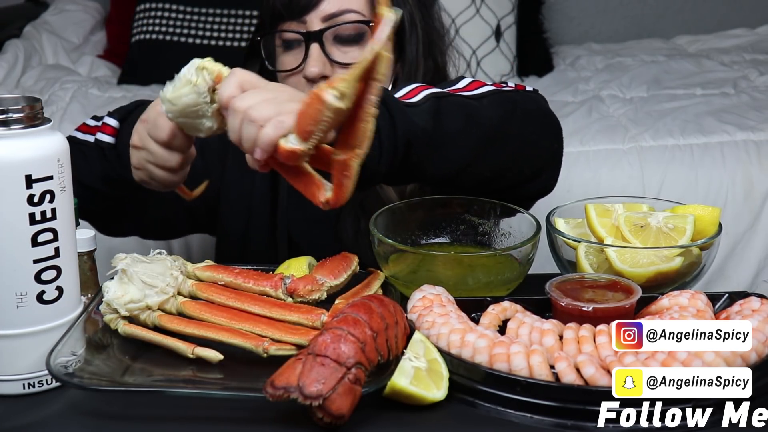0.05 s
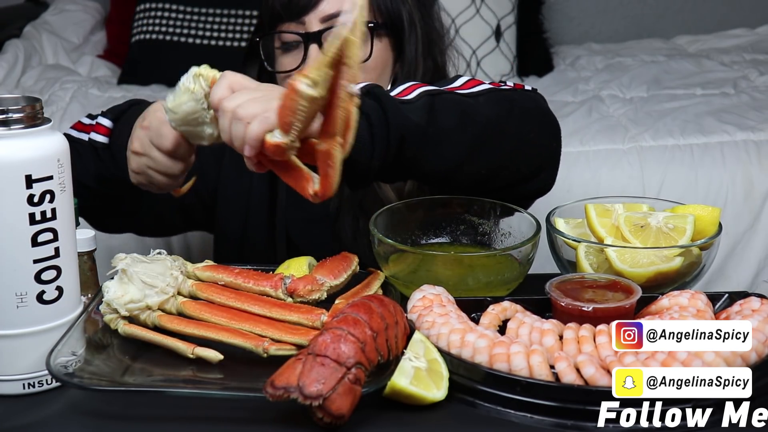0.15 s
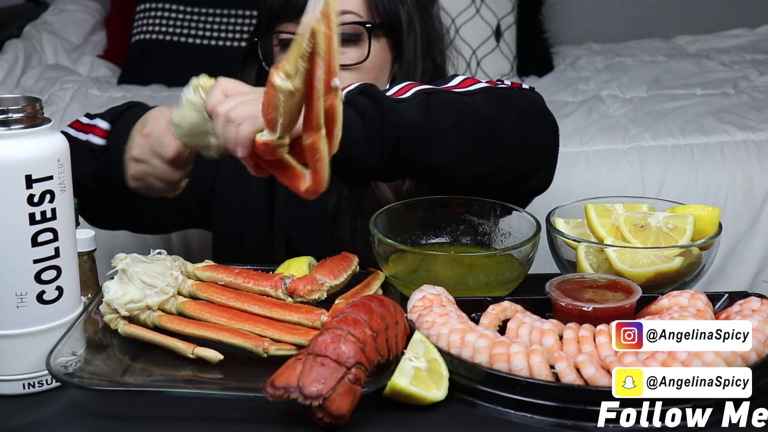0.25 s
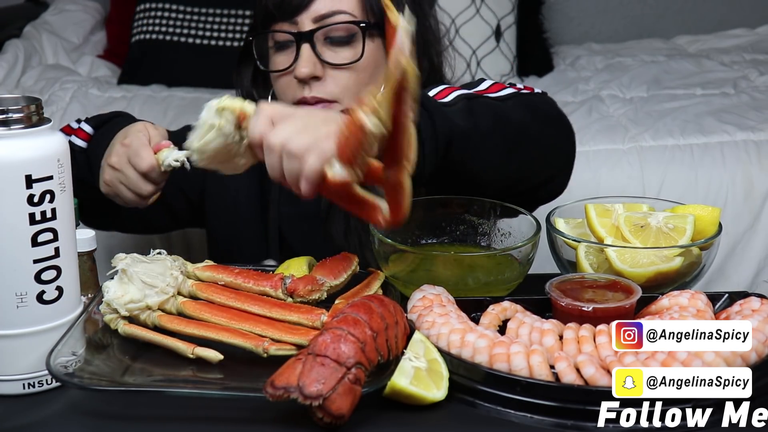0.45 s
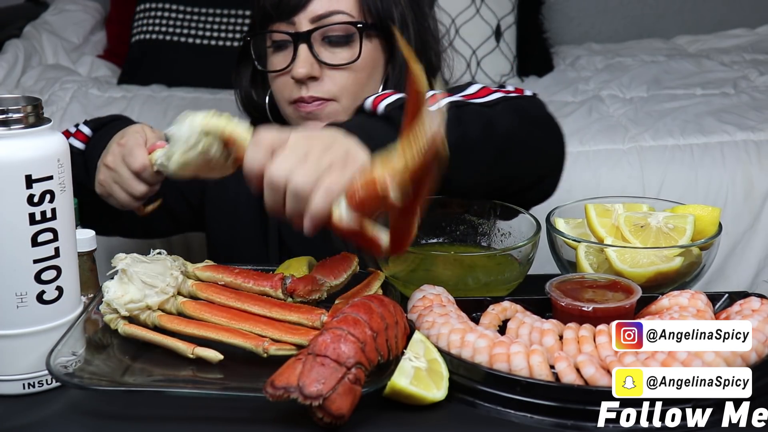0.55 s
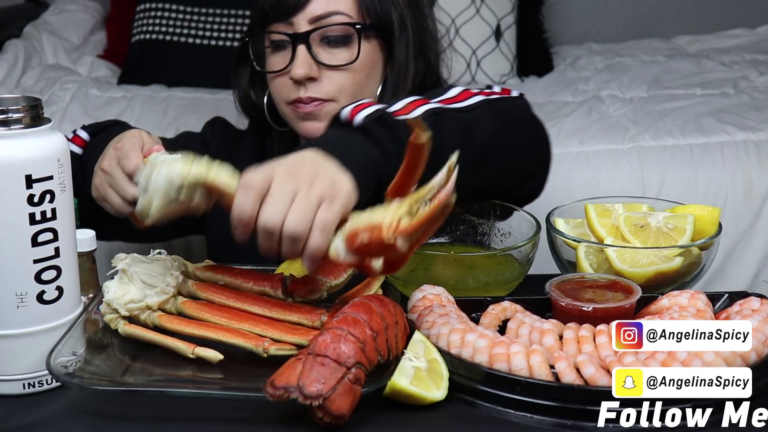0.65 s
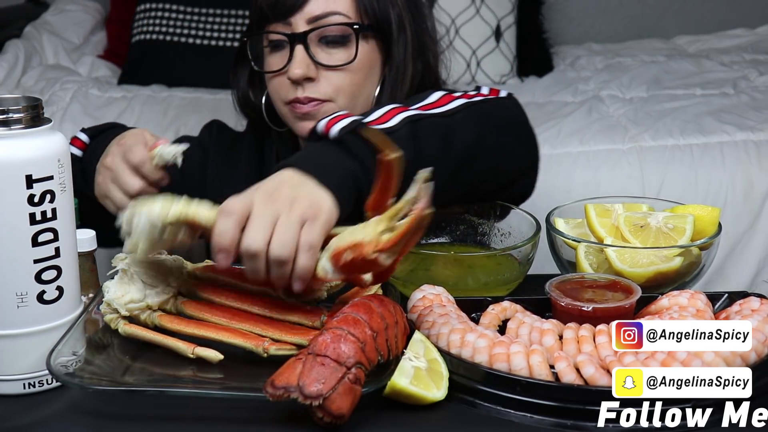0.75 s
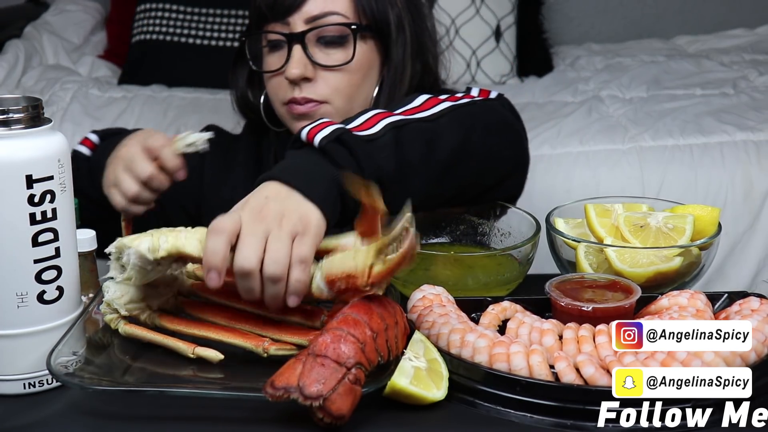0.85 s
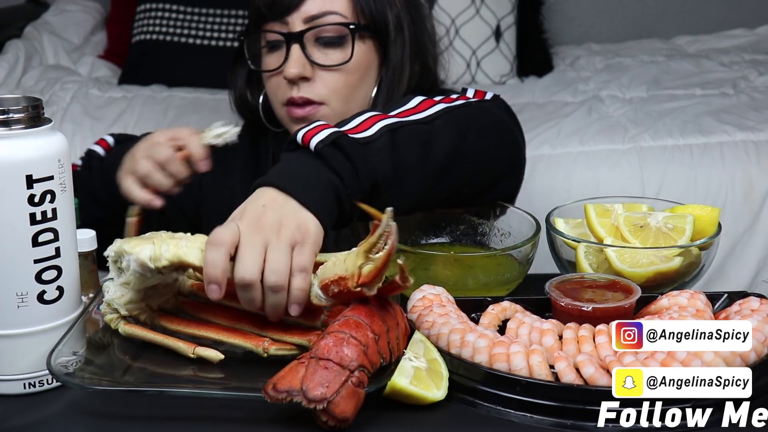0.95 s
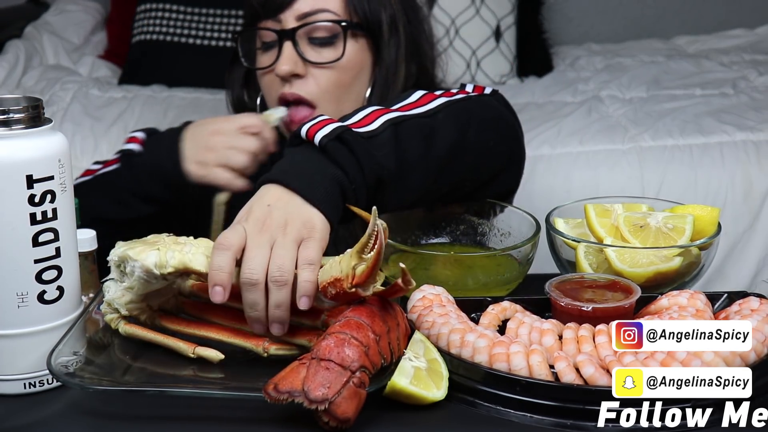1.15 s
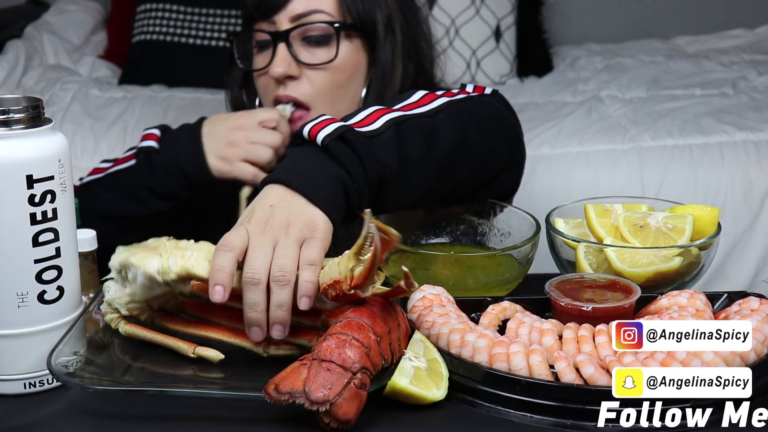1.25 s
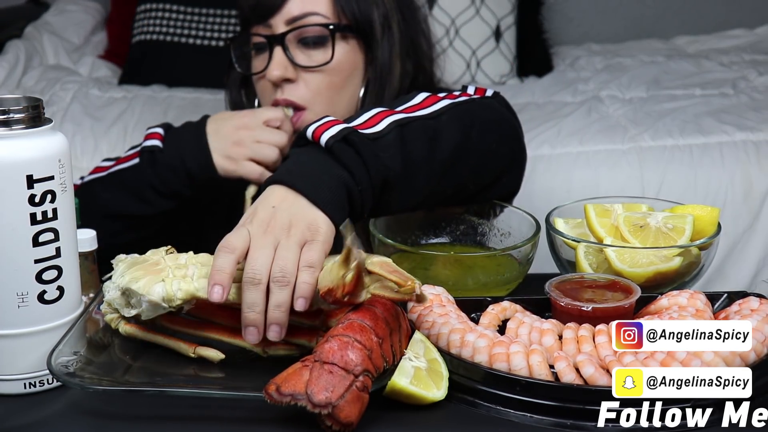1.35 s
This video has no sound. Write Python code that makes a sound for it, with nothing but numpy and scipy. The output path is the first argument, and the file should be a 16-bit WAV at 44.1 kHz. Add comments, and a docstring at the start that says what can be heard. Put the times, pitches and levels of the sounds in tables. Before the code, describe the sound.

Crab shell splinters and snaps in a quick run, followed by a knock and light ticks.

```python
"""Cracking a crab leg

A crab leg is bent by hand in a small room. It splinters and gives way in a growing run of cracks,
each a tiny blow that makes the shell ring. Soft thuds follow as the piece comes free. The cluster of
legs knocks down on a platter, the table wobbles, and the shells tick and rub as they are handled.
Glasses on the table ring faintly along."""
import sys
import numpy as np
from scipy import signal
from scipy.fft import rfft, irfft
from scipy.io import wavfile
from scipy.ndimage import uniform_filter1d

SR = 44100
rng = np.random.default_rng(int(sys.argv[2]) if len(sys.argv) > 2 else 0)


def transcribe(signal):
    """Save signal, clipped to [-1, 1], as a 16-bit WAV file at the path in sys.argv[1]."""
    frames = np.atleast_2d(signal).T
    limited = np.clip(frames, -1, 1)
    pcm = np.round(limited * 32767).astype(np.int16)
    wavfile.write(sys.argv[1], SR, pcm)


N = 61739
T = np.arange(N) / SR
SNAP_LOW_HZ, SNAP_HIGH_HZ = 8370, 14000


def from_db(db):
    """Turn decibels into a gain to multiply by."""
    return 10 ** (np.asarray(db) / 20)


def rms_one(x):
    """Scale a sound so its average strength (rms) is 1."""
    return x / np.sqrt(np.mean(x ** 2) + 1e-20)


def level(curve):
    """Join (time [s], level [dB]) points into a gain that changes over time."""
    return from_db(np.interp(T, *np.transpose(curve)))


def gain_at(colour, hz):
    """Read the gain at each pitch from (pitch [Hz], level [dB]) points."""
    colour = np.array(colour)
    return from_db(np.interp(np.log(hz + 1e-9), np.log(colour[:, 0]), colour[:, 1]))


def coloured(noise, colour):
    """Give noise a colour, its balance of low and high pitches, at strength 1."""
    return rms_one(irfft(rfft(noise) * gain_at(colour, np.fft.rfftfreq(N, 1 / SR)), N))


def clicks(times, gains):
    """Place a one-sample click at each time."""
    out = np.full(N, 1e-18)
    np.add.at(out, np.clip((times * SR).astype(int), 0, N - 1), gains)
    return out


def resonate(x, hz, width):
    """Ring at one pitch; a smaller width rings longer."""
    r = np.exp(-np.pi * width / SR)
    feedback = [1, -2 * r * np.cos(2 * np.pi * hz / SR), r * r]
    return signal.lfilter(np.array([1, 0, -1]) * (1 - r * r) / 2, feedback, x)


def friction(curve, colour, grains_per_s=900, spread_db=3.0):
    """Shell that splinters or slides makes tiny clicks (grains) over a soft hiss."""
    sizes = from_db(spread_db * np.minimum(rng.exponential(1, N), 5)) * rng.choice([-1, 1], N)
    grains = rms_one(sizes * (rng.random(N) < grains_per_s / SR))
    return level(curve) * coloured(.8 * grains + rng.standard_normal(N), colour)


def splintering():
    """A fading hiss of room echo opens the sound; then the leg creaks and splinters."""
    # strength of the hiss, then the splintering: (time [s], level [dB])
    loudness = [(0, -47.5), (.05, -55.5), (.10, -52.5), (.155, -69), (.18, -47), (.25, -41.5), (.33, -42),
                (.37, -40.5), (.45, -62.5), (.6, -80), (.8, -90)]
    # its colour: (pitch [Hz], level [dB])
    colour = [(200, -25), (500, -16.5), (900, -3.5), (1600, -2), (2300, -2.5), (3100, 2.5), (7000, -8),
              (15000, -14)]
    return friction(loudness, colour)


def arms_shifting():
    """The table rumbles as arms shift on it."""
    # strength of the rumble: (time [s], level [dB])
    loudness = [(0, -86), (.10, -77.5), (.3, -69), (.58, -55.5), (.68, -67.5), (.80, -74), (.89, -56.5),
                (1.04, -54), (1.14, -58), (1.26, -55), (1.33, -69), (1.40, -63)]
    # its colour: (pitch [Hz], level [dB])
    colour = [(30, -12), (70, -3), (130, -0.5), (195, 0), (260, -12.5), (500, -27), (2000, -56)]
    return level(loudness) * coloured(rng.standard_normal(N), colour)


def background():
    """A quiet, steady noise, mostly low in pitch."""
    # colour of the noise: (pitch [Hz], level [dB])
    colour = [(20, 6.5), (60, -1.5), (120, -9), (300, -12), (700, -19), (2000, -23.5), (6000, -28.5),
              (16000, -35)]
    return from_db(-61) * coloured(rng.standard_normal(N), colour)


def ring(times, db, tones, break_s=.0007):
    """Each blow starts every tone at its own instant within the short break."""
    lags = rng.random((len(times), len(tones))) * break_s
    out = 0
    for lag, (hz, width, tone_db) in zip(lags.T, tones):
        starts = times + lag * min(1, hz / SNAP_LOW_HZ)
        out += resonate(clicks(starts, from_db(db + tone_db)), hz, width)
    return out


def snap(times, db, decay_s=.0009):
    """Tiny fractures add a bright burst to each blow."""
    fade = np.exp(-2 / (decay_s * SR))
    power = signal.lfilter([1 - fade], [1, -fade], clicks(times, from_db(db) ** 2))
    band = signal.butter(2, [SNAP_LOW_HZ, SNAP_HIGH_HZ], "band", fs=SR, output="sos")
    return signal.sosfilt(band, np.sqrt(power) * rng.choice([-1, 1], N))


def shell_hits(events, body_tones):
    """A blow rings a body (hollow leg or platter), the shell's wall and its edge, with a snap."""
    # tones of the stiff shell wall: (pitch [Hz], width [Hz], level [dB])
    wall = [(3047, 350, -5), (3490, 500, -5.5), (4425, 670, -2)]
    # tones of the broken edge: (pitch [Hz], width [Hz], level [dB])
    edge = [(5460, 700, -1), (6270, 740, -.5), (7930, 530, -3), (9070, 1000, -9.5)]
    times, wall_db, body_db, edge_db, snap_db, low_cut_hz = np.transpose(events)
    body = 0
    for start, db, hz in zip(times, body_db, low_cut_hz):
        low_cut = signal.butter(4, hz, "high", fs=SR, output="sos")
        body += signal.sosfilt(low_cut, ring(np.array([start]), db, body_tones))
    return body + ring(times, wall_db, wall) + ring(times, edge_db, edge) + snap(times, snap_db)


def leg_cracks():
    """The shell breaks and the hollow leg rings; larger pieces sound lower."""
    # breaks: (time [s], wall [dB], hollow [dB], edge [dB], snap [dB], hollow's low cut [Hz])
    cracks = [(.0549, -14.5, -25.5, -12, -16, 895), (.0657, -23.5, -22, -29, -33, 485.3),
              (.0935, -13, -20, -22.5, -18, 606), (.1303, -37, -27, -26, -26, 864),
              (.1361, -22.5, -30.5, -26.5, -34, 910), (.1705, 3.5, 2, -4.5, -14, 819),
              (.2116, 3.5, 9, 6.5, -9, 850), (.2232, 2, 7.5, -3.5, -9.5, 825),
              (.2451, 1.5, 10.5, 3, -16.5, 780), (.2857, -15, -10.5, -9, -7.5, 833),
              (.2950, 14, 11, 7, 3.5, 350), (.2975, 4, 14.5, 6, -8.5, 300.7),
              (.3022, 3.5, 7, -7, -14.5, 350), (.3178, -1, 8.5, -5, -12.5, 800),
              (.3369, 11.5, 21.5, 11, -3, 327), (.3401, 16, 12, 9, -4.5, 446)]
    # tones of the hollow: (pitch [Hz], width [Hz], level [dB])
    hollow = [(360, 140, -17.5), (1050, 310, -.5), (1730, 380, -4.5)]
    # pitches the leg sends out better or worse: (pitch [Hz], width [Hz], boost or cut [dB])
    bands = [(1399, 170, 1), (2403, 420, -6.5)]
    out = shell_hits(cracks, hollow)
    for hz, width, db in bands:
        out += (from_db(db) - 1) * resonate(out, hz, width)
    return out


def glassware(hits):
    """Glasses on the table ring faintly with each hit."""
    # tones of the glasses: (pitch [Hz], width [Hz], level [dB])
    tones = [(1158, 9, -1.5), (1233, 7, 2), (1599, 7, 5.5), (1831, 7, 2), (1883, 9.6, 0)]
    return sum(from_db(db) * resonate(hits, hz, width) for hz, width, db in tones)


def table_echo(hits, delay_s=.003):
    """The hits bounce off the table top, a little later and quieter."""
    return from_db(-17) * np.interp(T - delay_s, T, hits, left=0)


def room(x, build_s=.0039, walls_s=.021, walls_spread_s=.0066):
    """Echoes blur into a tail that builds quickly and dies sooner at high pitches."""
    # the room's tail: (pitch [Hz], level against the sound going in [dB], time to fade 60 dB [s])
    bands = [(100, -15, 0.61), (300, -9, 0.9), (609.6, -8, .36), (1030, -7, 0.35), (1830, -1.5, 0.37),
             (2490, -0.5, 0.38), (4650, -3, 0.4), (7630, -3, .28), (15000, -2.5, 0.27)]
    hz, white = np.fft.rfftfreq(N, 1 / SR), rfft(rng.standard_normal(N))
    centres, tail = np.log([row[0] for row in bands]), 0
    for share, (_, _, fade_s) in zip(np.eye(len(bands)), bands):
        band_noise = irfft(white * np.interp(np.log(hz + 1), centres, share), N)
        tail += band_noise * from_db(-60 * T / fade_s)
    first_bounces = from_db(-5) * np.exp(-((T - walls_s) / walls_spread_s) ** 2)
    spectrum = rfft(tail * (np.minimum(T / build_s, 1) + first_bounces))
    evened = spectrum / np.sqrt(uniform_filter1d(np.abs(spectrum) ** 2, 201))
    return signal.fftconvolve(x, irfft(evened * gain_at(bands, hz), N))[:N]


def short_tones(events):
    """Each event is one tone that swells and dies away."""
    out = 0
    for start, hz, db, rise_s, fade_s in events:
        age = np.maximum(T - start, 0)
        loudness = from_db(db - 60 * age / fade_s) * np.minimum(age / rise_s, 1)
        out += loudness * np.sin(2 * np.pi * hz * age)
    return out


def hand_thuds():
    """Hands and food bump with dull thuds."""
    # bumps: (time [s], pitch [Hz], level [dB], rise [s], time to fade 60 dB [s])
    bumps = [(.060, 723, -53, .004, 0.065), (0.079, 260, -49.5, 0.0013, 0.04),
             (.112, 583, -51, 0.0014, 0.038), (.391, 261, -19, 0.0037, 0.019),
             (.405, 289, -40.5, .004, 0.11), (.484, 440, -38.5, 0.0073, 0.036),
             (.487, 655, -39.5, 0.0023, 0.026), (0.497, 203, -24.5, 0.015, 0.095), (.492, 50, -43, .01, .1),
             (0.503, 128, -45, 0.0081, 0.24), (.530, 170.4, -36.5, .012, 0.24),
             (.612, 546, -49.5, 0.0012, 0.026), (.680, 296.2, -54.5, .015, 0.13),
             (0.929, 146.6, -26.5, 0.014, 0.1), (0.931, 66.6, -34, 0.015, 0.3),
             (.938, 198.5, -33, 0.004, 0.093), (1.375, 181.7, -42, 0.012, 0.16)]
    return short_tones(bumps)


def shell_rubbing():
    """Shells slide over each other on the platter."""
    # strength of the rubbing: (time [s], level [dB])
    loudness = [(.6, -93.5), (.81, -75.5), (.88, -57), (.92, -62), (.97, -46.5), (1.07, -69), (1.15, -76.5),
                (1.24, -76.5), (1.31, -67.5), (1.35, -60), (1.40, -51.5)]
    # its colour: (pitch [Hz], level [dB])
    colour = [(200, -19), (500, -8.5), (850, 2.5), (1600, 4), (2400, -5.5), (3800, -8.5), (7000, -12),
              (15000, -23)]
    return friction(loudness, colour)


def table_wobble(hz=29.6):
    """The table shakes under the load with a very deep tone."""
    # strength of the wobble: (time [s], level [dB])
    loudness = [(.88, -61), (.92, -48), (.99, -46.5), (1.03, -33.5), (1.11, -33), (1.19, -39.5),
                (1.30, -40), (1.40, -44)]
    return level(loudness) * rms_one(np.sin(2 * np.pi * hz * T))


def platter_knocks():
    """Shell knocks and ticks on the platter, and both ring."""
    # knocks: (time [s], wall [dB], platter [dB], edge [dB], snap [dB], platter's low cut [Hz])
    knocks = [(.9287, -8, 13, -10, -22, 243), (.9361, -9, -29, -30, -48, 402),
              (.9621, -24, 3, -9.5, -31, 392), (1.0580, -18, -9, -18, -31, 594),
              (1.0911, -35, -13, -32, -46, 600), (1.1758, -48, -68, -45, -44.5, 600),
              (1.3247, -18.5, -17.5, -30.5, -26.5, 705)]
    # tones of the platter: (pitch [Hz], width [Hz], level [dB])
    platter = [(386, 270, -14.5), (903, 277, -3), (1350, 102, 1), (1940, 140, -36), (3880, 110, -9)]
    return shell_hits(knocks, platter)


def knock_echo():
    """A brief ringing echo near 1.4 kHz follows the first platter knock."""
    # tones of the echo: (time [s], pitch [Hz], level [dB], rise [s], time to fade 60 dB [s])
    tones = [(.9455, 1410, -14, 0.0064, 0.017), (.9505, 1470, -22, 0.0046, 0.014)]
    return short_tones(tones)


def scene():
    """Add up shell, platter, glasses, table and room in one channel."""
    cracks, knocks, thuds = leg_cracks(), platter_knocks(), hand_thuds()
    hits = cracks + knocks + knock_echo()
    echoes = table_echo(hits) + room(cracks + from_db(-1.5) * knocks + from_db(1) * thuds)
    scraping = splintering() + shell_rubbing()
    rumble = arms_shifting() + table_wobble()
    return (hits + thuds + glassware(hits) + echoes + scraping + rumble + background())[None]


def record(dry, cutoff_hz=16000):
    """Cut off the very highest pitches steeply."""
    return signal.sosfilt(signal.ellip(10, .1, 100, cutoff_hz, fs=SR, output="sos"), dry)


dry = scene()
out = record(dry)
transcribe(out)
```